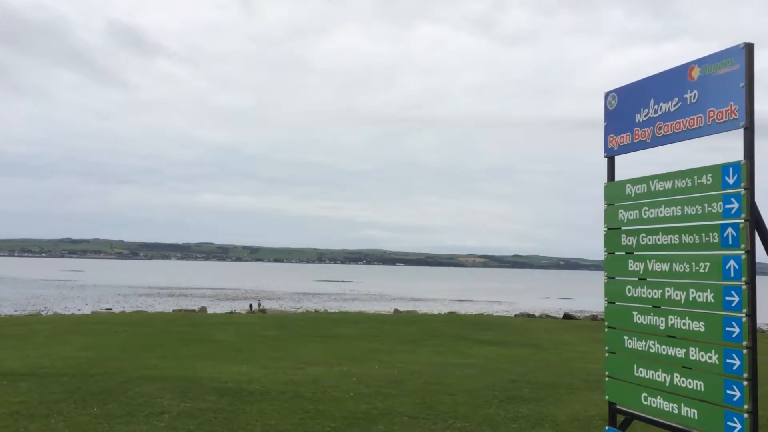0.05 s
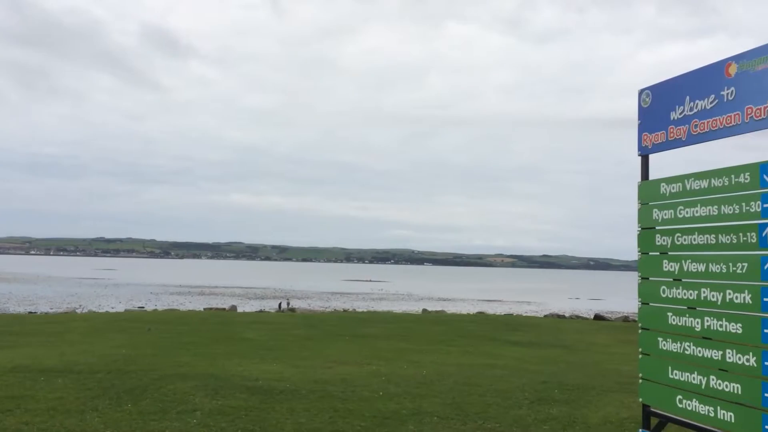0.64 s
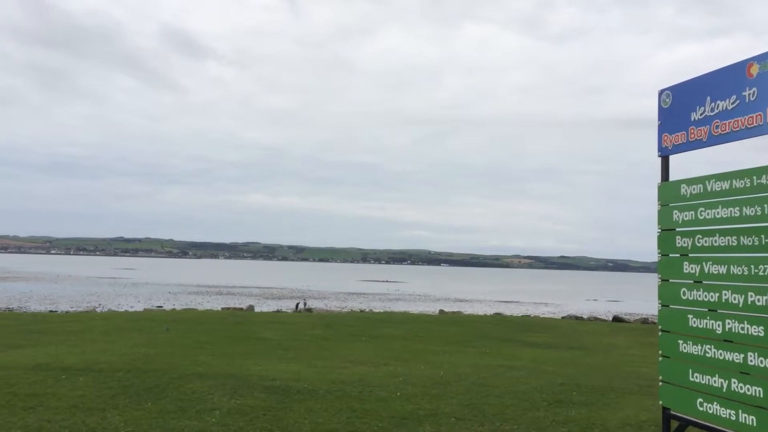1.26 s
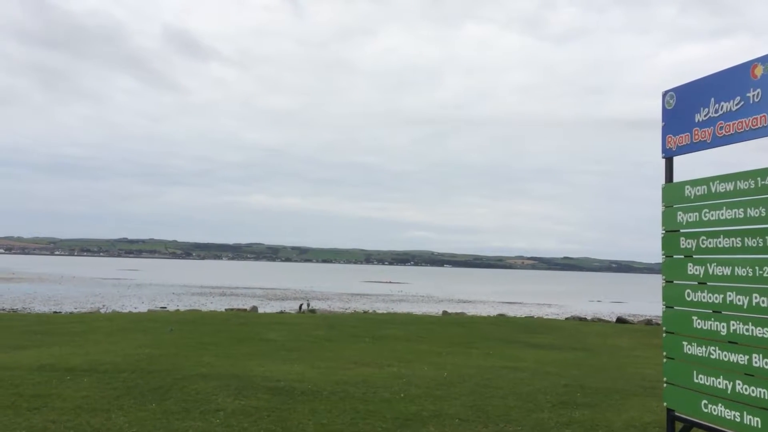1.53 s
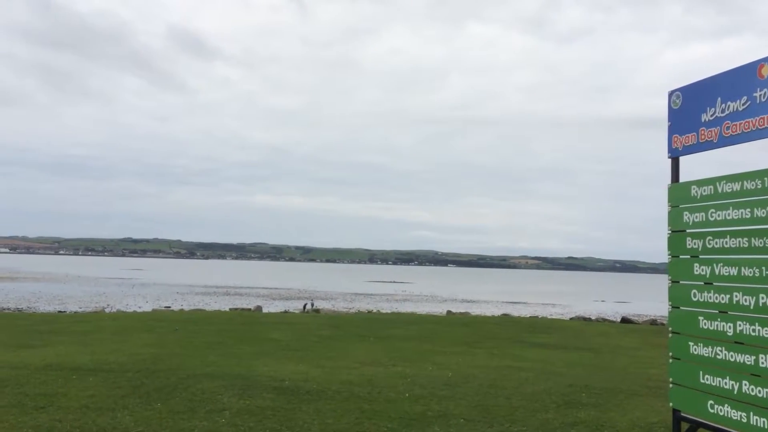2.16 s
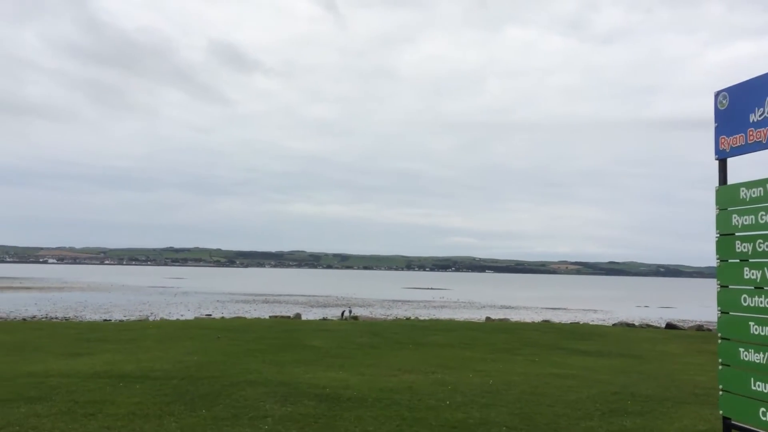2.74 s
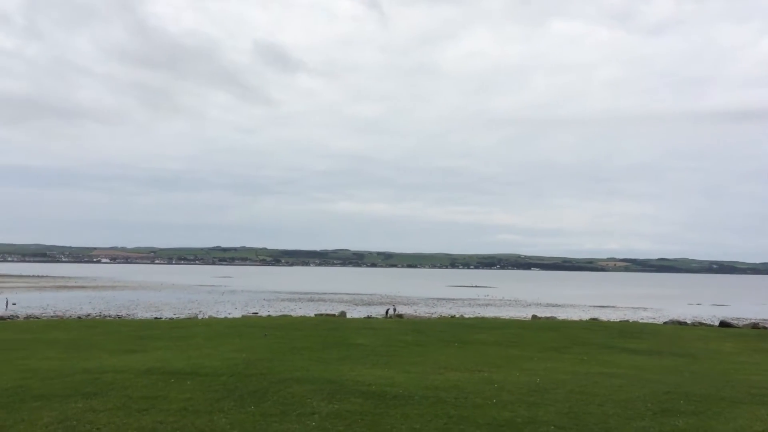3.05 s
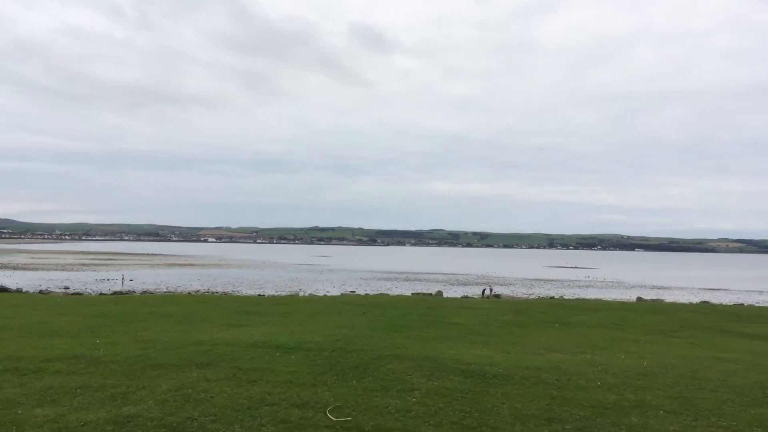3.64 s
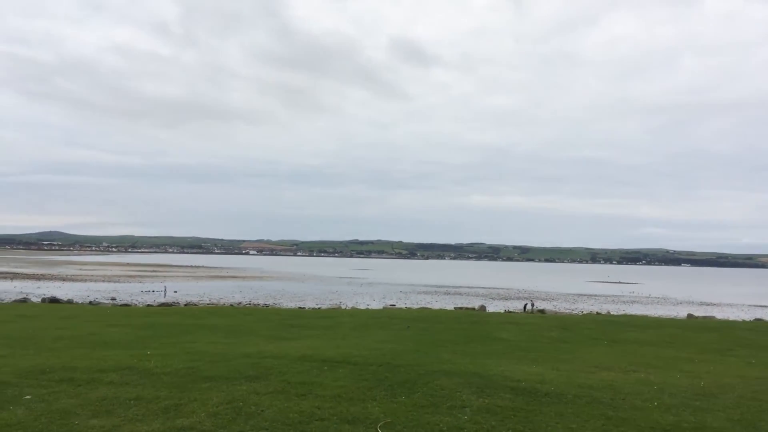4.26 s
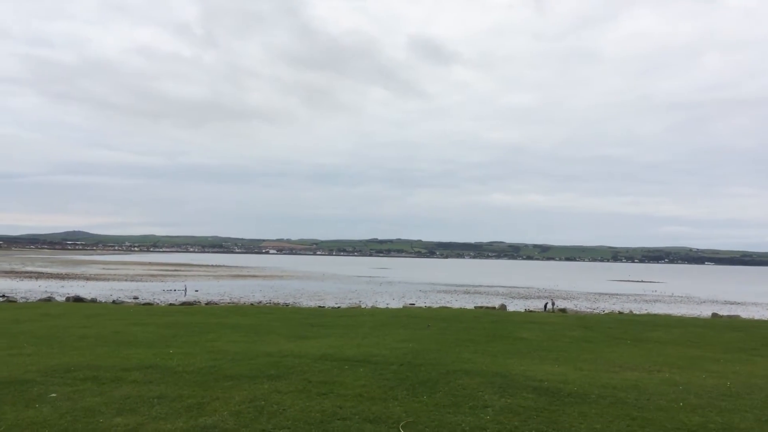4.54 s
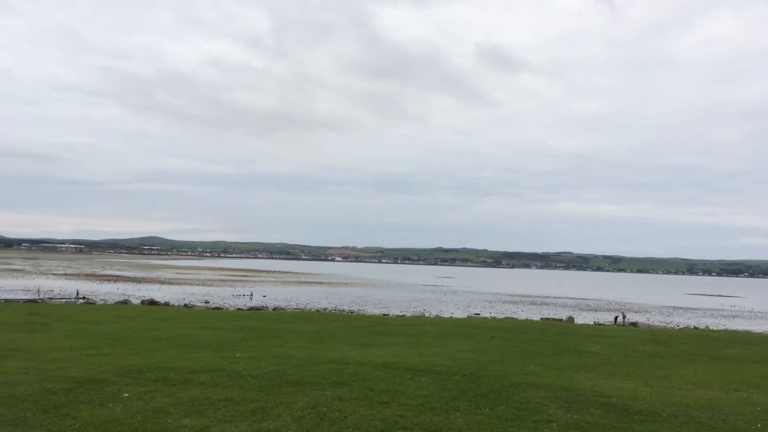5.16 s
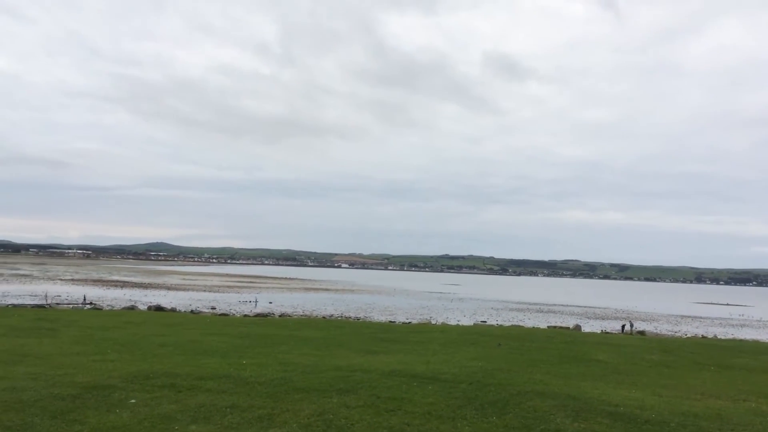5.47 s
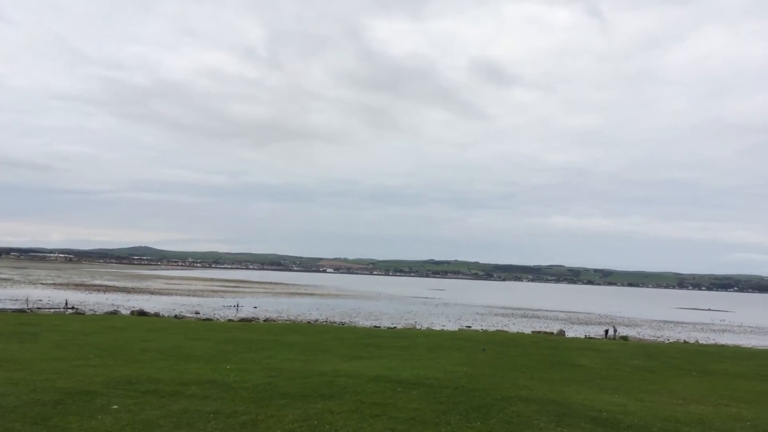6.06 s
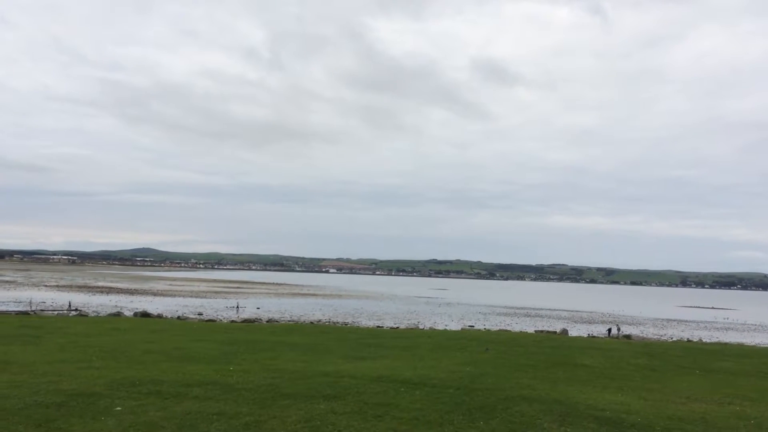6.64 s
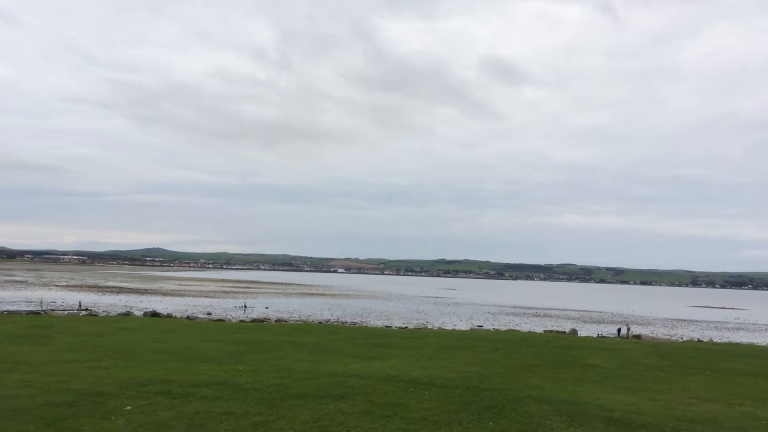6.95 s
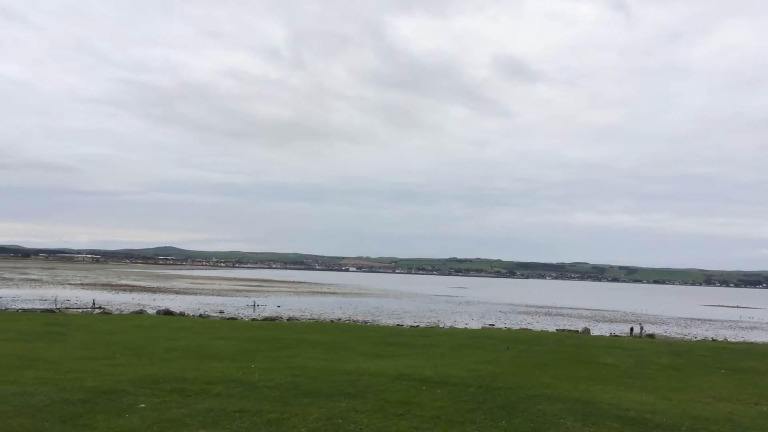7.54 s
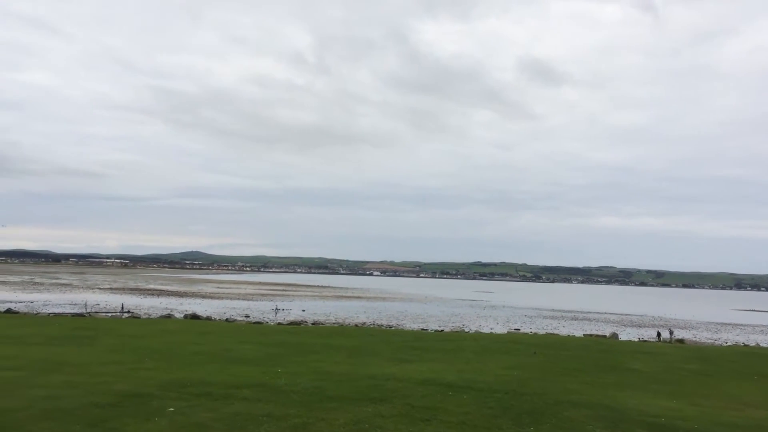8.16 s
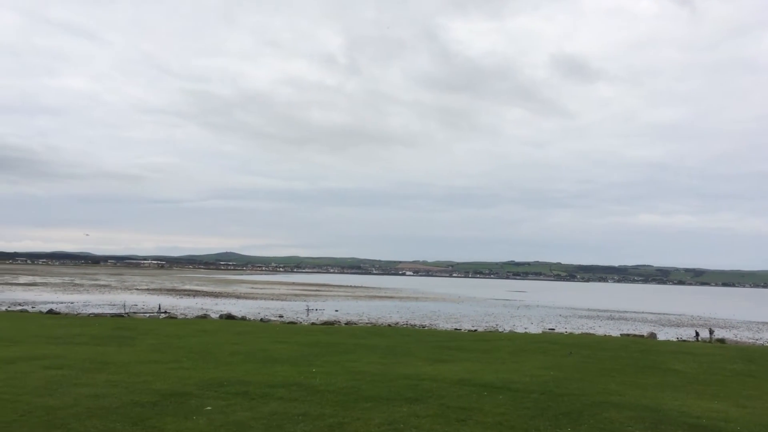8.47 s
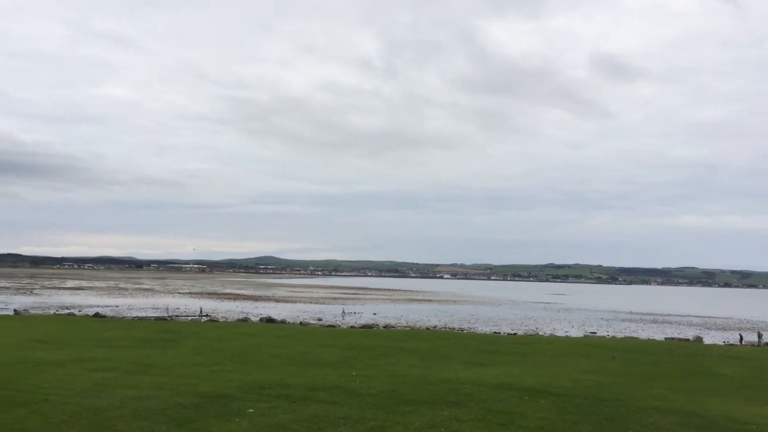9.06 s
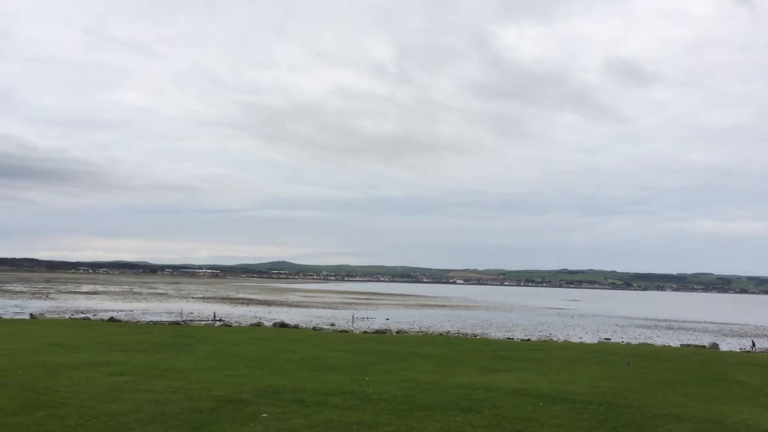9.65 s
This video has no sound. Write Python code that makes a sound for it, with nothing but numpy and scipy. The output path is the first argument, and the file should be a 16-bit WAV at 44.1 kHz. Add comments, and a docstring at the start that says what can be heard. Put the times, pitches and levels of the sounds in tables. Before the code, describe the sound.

On an open grassy shore, a sparrow close to the microphone gives short, high chirps in pairs. Shore birds pipe further out, and gulls faintly wail and yelp early on. A distant road roars softly over the bay's steady low rumble, growing louder with a drone from halfway as small waves wash in. Wind puffs buffet the microphone, hardest near the end, just before a quick run of chirrups.

```python
"""A grassy shore on a breezy day, one microphone. From the start a sparrow close by whistles paired
chirps with its syrinx, shore birds pipe and gulls wail out on the flats, and tyres roar softly on a
distant road over the rumble of the bay. Around 2 s the gulls yelp and a far engine hums by. From halfway
the road grows louder and gains a drone, hollow wavelets wash in and a soft hiss swells twice. Puffs of
wind buffet the microphone, hardest at 8.6 s, just before the sparrow's closing chirrups."""
import sys
import numpy as np
from scipy import signal
from scipy.fft import rfft, irfft
from scipy.io import wavfile
from scipy.ndimage import uniform_filter1d, map_coordinates

SR = 44100
rng = np.random.default_rng(int(sys.argv[2]) if len(sys.argv) > 2 else 0)


def to_wav(sig):
    """Store sig (one row per channel, or 1-D mono) as 16-bit WAV at the path in sys.argv[1].

    Samples outside -1..1 are clipped; the rate is SR.
    """
    pcm = np.clip(np.atleast_2d(sig), -1, 1) * 32767
    pcm = np.round(pcm).astype(np.int16)
    wavfile.write(sys.argv[1], SR, pcm.T)  # frames by channels


N = 432621
T = np.arange(N) / SR


def sparrow():
    """The bird close to the microphone pairs a flick with a tweet, or a tumble with a chirrup."""
    out = np.zeros(N)
    for table, voice in [(FLICKS, flick), (TWEETS, tweet), (TUMBLES, tumble),
                         (CHIRRUPS, chirrup), (SECOND_VOICE, second_voice)]:
        for s, *row in table:
            add(out, s, voice(*row))
    for s, *_, db in TWEETS:
        add(out, s - UPSTROKE_S, upstroke(db))
    fizz = wash([(300, -2), (3000, -5), (10000, -16)], patchy_db=2.5)  # Hz away from the note, dB
    return out * (1 + gain_of(-17) * fizz)  # a faint hiss edges each chirp


def note(hz, db, rasp=.15, onset_db=-5.5, onset_s=.014):
    """One slightly raspy sparrow note that swells in and follows a pitch and a level."""
    t = np.arange(len(hz)) / SR
    hz = uniform_filter1d(hz, size=90)  # muscles round off the turns
    tone = whistle(hz, overtone_db=-28, flutter=.018, flutter_hz=903)
    tone *= 1 + rasp * wander(len(t), 3000)
    swell_db = onset_db * np.exp(-t / onset_s)
    return tone * gain_of(db + swell_db) * signal.windows.tukey(len(t), 250 / len(t))


def beak_db(hz, resonance_hz=5000, db_per_octave=-22.5):
    """Loss on either side of the beak's resonance."""
    return db_per_octave * abs(np.log2(hz / resonance_hz))


# Soft flicks. Each row: start in seconds, level in dB before the beak's loss.
FLICKS = [(.927, -65.5), (2.356, -69), (2.384, -59), (6.236, -64), (8.084, -71), (8.112, -64)]
# Their shared swing. Each row: seconds into the flick, pitch in Hz.
FLICK_SWING = [(0, 4450), (0.01, 7480), (0.025, 3700), (.032, 6070)]

def flick(db):
    """The pitch goes up, down and up again in a thirtieth of a second."""
    hz, = follow(FLICK_SWING, np.arange(0, FLICK_SWING[-1][0], 1 / SR))
    return note(hz, db + beak_db(hz))


# Tweets. Each row: start and length in seconds, base pitch in Hz, climb in Hz per second,
# level in dB before the beak's loss.
TWEETS = [(1.089, 0.034, 5220, 19000, -50), (2.555, 0.033, 5260, -9000, -50.5),
          (6.401, 0.029, 4930, 16000, -53), (8.274, 0.036, 5140, -8000, -50)]
UPSTROKE_S = .014

def tweet(length, base_hz, climb, db, scoop=.26, scoop_s=.0069, fade_db=-21):
    """A note that scoops up from below, then slides and fades."""
    t = np.arange(0, length, 1 / SR)
    hz = base_hz * (1 - scoop * np.exp(-t / scoop_s)) + climb * t
    return note(hz, db + beak_db(hz) + fade_db * (t / length) ** 2)


def upstroke(tweet_db):
    """A faint, very fast rise that leads into a tweet."""
    hz = np.linspace(4000, 6100, round(UPSTROKE_S * SR))
    return note(hz, tweet_db - 13 + beak_db(hz))


# Soft tumbles. Each row: start, length, time up high and fall time in seconds, warbles per second,
# warble depth as a share of pitch, level in dB before the beak's loss.
TUMBLES = [(4.672, 0.11, 0.036, .004, 45, 0.23, -60), (7.08, 0.14, 0.041, 0.0074, 35, 0.25, -64.5),
           (8.51, 0.073, .038, 0.0035, 24, .11, -62.5), (8.845, 0.073, 0.04, 0.0022, 31, 0.066, -54.5)]

def tumble(length, high_s, fall_s, rate, depth, db, high_hz=7070, low_hz=4310):
    """A note that starts thin and high, then drops to a low warble that sinks and fades."""
    sag_hz_per_s, fade_db_per_s = 5900, -64
    t = np.arange(0, length, 1 / SR) - high_s
    low_s = np.maximum(t, 0)
    hz = low_hz + (high_hz - low_hz) / (1 + np.exp(t / fall_s)) - sag_hz_per_s * low_s
    hz *= 1 + depth * warble(t * rate + .5)
    return note(hz, db + beak_db(hz) + fade_db_per_s * low_s)


# Chirrups. Each row: start and length in seconds, start, middle and end of the glide in Hz,
# warbles per second, warble depth as a share of pitch, level in dB.
CHIRRUPS = [(.003, 0.054, 4180, 4200, 3220, 55, 0.25, -64), (.122, 0.064, 4600, 5050, 4100, 30, 0.37, -54),
            (4.833, .021, 3500, 6140, 4700, 20, .02, -64), (4.849, 0.0535, 4200, 4760, 4430, 34, 0.24, -50),
            (7.225, 0.038, 4620, 3950, 6530, 22, 0.08, -66),
            (7.263, .056, 5530, 5000, 4250, 36, 0.19, -53.5),
            (8.691, 0.096, 3500, 6210, 5000, 30.6, 0.2, -52.5),
            (8.908, .04, 3740, 2900, 4240, 46, .1, -68.5),
            (9.008, 0.032, 4650, 4300, 4950, 29, 0.24, -58.5),
            (9.032, 0.065, 4600, 6450, 4500, 26, 0.11, -51.5),
            (9.088, 0.013, 4700, 5500, 4380, 20, .02, -55)]
NOTE_ENDS_DB = -7

def chirrup(length, start_hz, middle_hz, end_hz, rate, depth, db, crest_db=-12):
    """A glide with a warble riding on it, weaker on each crest and towards its ends."""
    t = np.arange(0, length, 1 / SR)
    u, crest = t / length, warble(t * rate)
    hz = glide([start_hz, middle_hz, end_hz], u) * (1 + depth * crest)
    return note(hz, db + crest_db * crest ** 2 + NOTE_ENDS_DB * (2 * u - 1) ** 4)


# The sparrow's second voice. Each row: start and length in seconds, top pitch in Hz, level in dB.
SECOND_VOICE = [(.118, 0.015, 4400, -59), (.149, .016, 4570, -60), (4.866, 0.016, 4610, -47.5),
                (8.854, 0.013, 5350, -61), (8.917, 0.016, 5900, -63), (9.054, 0.027, 4540, -61)]

def second_voice(length, top_hz, db):
    """The other side of the syrinx adds a short, cleaner arch."""
    u = np.linspace(0, 1, round(length * SR))
    hz = top_hz * arch(u, rise=.13, sag=.14)
    return note(hz, db + NOTE_ENDS_DB * (2 * u - 1) ** 2, rasp=.099)


# The nearer shore birds. Each row: start and length in seconds, top pitch in Hz, level in dB before lift.
PIPES = [(.048, 0.063, 3060, -69), (0.38, 0.053, 2670, -71.5), (0.438, 0.03, 2980, -67.5),
         (0.577, 0.087, 2680, -72.5), (0.993, .052, 2670, -71), (1.154, 0.035, 2600, -71),
         (1.226, 0.067, 2620, -70.5), (1.412, 0.03, 2600, -70.5), (1.496, 0.082, 2690, -70.5),
         (1.667, .06, 2680, -75), (2.031, 0.046, 2970, -71), (4.304, 0.034, 2550, -67.5),
         (4.352, 0.053, 2840, -69.5), (4.874, 0.056, 3270, -67.5), (5.588, 0.067, 3270, -67),
         (6.067, 0.15, 3240, -69.5), (6.258, 0.085, 3270, -74), (6.706, 0.12, 3280, -74.5),
         (7.603, 0.042, 2670, -68), (8.146, 0.11, 2475, -71), (8.414, 0.096, 2587, -71.5),
         (8.677, 0.11, 2660, -68.5), (8.921, .15, 2570, -66), (9.202, 0.077, 2630, -68.5),
         (9.235, .11, 2632, -65.5), (9.459, 0.049, 2690, -69.5), (9.533, 0.084, 2605, -68.5),
         (9.623, .042, 3120, -75)]
# The flock's bouts. Each row: start and end in seconds, calls per second, mean pitch in Hz, level in dB.
FLOCK_BOUTS = [(0, 2.4, 12, 2580, -78), (3.201, 6.8, 5.3, 2850, -78), (7.5, 9.7, 10, 2464, -75.5)]

def shore_birds(lift_db=2, pitch_spread=.0595, spread_db=5.5, call_s=(.03, .1)):
    """Pipers out on the flats, over a flock that chatters further from the microphone."""
    out = np.zeros(N)
    for s, length, hz, db in PIPES:
        add(out, s, pipe(length, hz, db + lift_db))
    for start, end, rate, hz, db in FLOCK_BOUTS:
        draws = rng.uniform(-1, 1, (64, 4))
        for s, (late, longer, higher, louder) in zip(np.arange(start, end, 1 / rate), draws):
            length = np.interp(longer, [-1, 1], call_s)
            call = pipe(length, hz * (1 + pitch_spread * higher), db + spread_db * louder)
            add(out, s + (1 + late) / (2 * rate), call)
    return out


# Lower pipes have the stronger octave. Each row: top pitch in Hz, relative octave level in dB.
PIPE_OCTAVE = [(2650, -16), (3100, -27)]

def pipe(length, top_hz, db):
    """One arched piping note; the long path through moving air makes it flicker."""
    u = np.linspace(0, 1, round(length * SR))
    hz = top_hz * arch(u, rise=.096, sag=.115)
    tone = whistle(hz, spectrum_db(PIPE_OCTAVE, top_hz), flutter=.005, flutter_hz=300)
    husky = unit_rms(tone * (1 + .25 * wander(len(u), 601)))
    envelope = signal.windows.tukey(len(u), .22) * (1 - .3 * u)
    return husky * gain_of(db + 2.6 * wander(len(u), 130)) * envelope


# Gulls far out. Each row: start and length in seconds, top pitch in Hz, level in dB.
GULL_WAILS = [(0.176, 0.21, 1278, -68), (0.643, 0.2, 1258, -66.5)]

def gull_wails(hoarse=.01, overtones_db=(0, -3, -21, -22)):
    """Hoarse wails: the fundamental does not carry to the microphone, only harmonics 2 to 5."""
    out = np.zeros(N)
    for s, length, top_hz, db in GULL_WAILS:
        u = np.linspace(0, 1, round(length * SR))
        phase = phase_of(top_hz * arch(u, rise=.11, sag=.17) * (1 + hoarse * wander(len(u), 900)))
        cry = sum(gain_of(level) * np.sin(k * phase) for k, level in enumerate(overtones_db, 2))
        cry *= 1 + .7 * wander(len(u), 1200)  # rasp
        add(out, s, gain_of(db) * unit_rms(cry) * signal.windows.tukey(len(u), .5))
    return out


# Distant yelps. Each row: start and length in seconds, start pitch in Hz, level in dB.
GULL_YELPS = [(1.749, .065, 1202, -67.5), (2.152, 0.039, 1153, -69)]

def gull_yelps(fall=.16, overtones_db=(3, -5, -8, -12)):
    """Short raspy yelps whose harmonics 2 to 5 slide down together."""
    out = np.zeros(N)
    for s, length, hz, db in GULL_YELPS:
        u = np.linspace(0, 1, round(length * SR))
        phase = phase_of(hz * (1 - fall * u))
        cry = sum(gain_of(level) * np.sin(k * phase) for k, level in enumerate(overtones_db, 2))
        cry *= 1 + .7 * wander(len(u), 900)  # rasp
        add(out, s, gain_of(db) * unit_rms(cry) * signal.windows.tukey(len(u), .4))
    return out


# Other far birds. Each row: start and length in seconds, start, middle and end pitch in Hz, level in dB.
SLURS = [(1.77, 0.062, 2750, 2380, 2100, -69), (2.288, 0.048, 5190, 4130, 3150, -72.5),
         (2.643, 0.027, 4800, 5030, 4500, -77), (2.825, .043, 3070, 3420, 3580, -78),
         (3.585, .04, 4750, 5150, 4800, -80), (3.932, .04, 4800, 5080, 4700, -80),
         (4.797, 0.025, 1170, 1150, 1120, -52.5), (5.242, 0.041, 2760, 2300, 1850, -62),
         (5.498, 0.039, 4880, 4830, 4400, -77), (5.666, 0.043, 2590, 2350, 1800, -64),
         (5.992, 0.042, 4700, 4820, 4640, -76)]

def small_birds(husky_span_hz=4200):
    """Thin notes that slur through three pitches; the wider the slide, the huskier."""
    out = np.zeros(N)
    for s, length, *pitches, db in SLURS:
        rasp = min(np.ptp(pitches) / husky_span_hz, 1)
        u = np.linspace(0, 1, round(length * SR))
        tone = whistle(glide(pitches, u), overtone_db=-24, flutter=.008, flutter_hz=500)
        husky = unit_rms(tone * (1 - rasp + rasp * wander(len(u), 1000)))
        add(out, s, husky * gain_of(db + 2 * wander(len(u), 105)) * signal.windows.tukey(len(u), .4))
    return out


# Wind right on the microphone. Each row: middle in seconds, level in dB, eddy rate in Hz.
PUFFS = [(1.744, -47, 83.5), (1.853, -47, 88), (1.9, -47.5, 76.5), (2.062, -45, 74.5), (2.618, -43.5, 190),
         (2.675, -40, 148), (2.732, -42.5, 86.6), (3.328, -37.5, 97), (3.355, -39, 85.5), (3.827, -40, 135),
         (4.383, -32, 114), (4.655, -41, 86.5), (4.757, -41.5, 129), (5.208, -36, 77),
         (6.423, -35.5, 113.6), (6.478, -35, 88), (7.392, -42.5, 83), (7.43, -43, 85), (7.827, -40.5, 79),
         (7.953, -38, 128), (7.996, -36.5, 70), (8.074, -33.5, 90), (8.092, -37, 139), (8.242, -35, 135),
         (8.258, -31, 115), (8.288, -34.5, 109), (8.635, -23, 106), (9.38, -42.5, 112), (9.45, -41.5, 78.5)]

def wind_puffs(length_s=.022, core_weight=12, crisp=.69, top_hz=640):
    """Single eddies thump the microphone: the faster the eddy, the higher it reaches."""
    out = np.zeros(N)
    t, hz = (np.arange(8192) - 4096) / SR, np.fft.rfftfreq(8192, 1 / SR)
    for s, db, eddy_hz in PUFFS:
        ratio = hz / (1.163 * eddy_hz)  # frequency over the eddy's upper corner
        low_cut = ratio ** 2 / (ratio ** 2 + .12)
        colour = low_cut / (1 + ratio ** 4.27) / (1 + (hz / top_hz) ** 8)
        swirl = rng.standard_normal(len(t)) * np.exp(-abs(t) / (length_s / 2))
        force = np.sqrt(gain_of(db + 30))
        # pressure flips as the core passes, sharply in hard puffs
        core = 1j * core_weight * (1 + crisp * force * ratio) * rfft(t == 0)
        puff = irfft((rfft(swirl) + core) * colour)
        add(out, s + t[0], gain_of(db) * puff * np.sqrt(length_s * SR / np.sum(puff ** 2)))
    return out


# Hard puffs. Each row: middle in seconds, level in dB, pitch in Hz.
SLAPS = [(4.382, -37.5, 236), (6.421, -32, 300), (8.258, -28, 255), (8.6323, -15, 282)]

def wind_slaps(width_cycles=.45):
    """Each hard puff slaps the microphone with one abrupt flip of pressure."""
    out = np.zeros(N)
    for s, db, hz in SLAPS:
        cycles = hz * (T - s)
        out -= gain_of(db) * np.sin(2 * np.pi * cycles) * np.exp(-(cycles / width_cycles) ** 2)
    return out


# The breeze between the puffs. Each row: time in seconds, level in dB.
BREEZE = [(.3, -79), (.7, -60), (1.5, -71.5), (1.8, -55), (2.1, -78), (2.33, -57), (3, -71), (3.87, -50.5),
          (4.15, -54.5), (4.8, -53), (5.1, -63.5), (6.45, -54.5), (6.75, -63), (7.7, -56), (8.15, -43),
          (8.45, -57), (8.6, -33.5), (8.73, -47), (9.8, -54.5)]
# Its eddies. Each row: frequency in Hz, relative density in dB.
BREEZE_COLOUR = [(15, -27), (35, -4), (60, 6), (100, -1.5), (150, -6.5), (220, -16.5), (350, -24),
                 (600, -33), (1500, -70)]

def breeze(lumpy_db=3.5):
    """Eddies rumble unevenly across the microphone."""
    eddies = wash(BREEZE_COLOUR, patchy_db=3) * gain_of(lumpy_db * wander(N, 22))
    return fader(BREEZE) * unit_rms(eddies)


# The distant road. Each row: time in seconds, roar in dB, openness from 0 (dull) to 1 (in the clear).
ROAD = [(0, -64.5, 0.8), (1.1, -65, 0.7), (2.3, -59, 0.15), (3.5, -58.5, 0.04), (4.1, -59.5, 0.67),
        (4.8, -53.5, 0.9), (6.2, -55.5, 0.87), (6.55, -53, 0.8), (7.33, -54.5, 0.78), (7.55, -58, 0.25),
        (8.3, -60, 0.03), (8.8, -64.5, 0.3), (9.25, -64, 0.15), (9.55, -61, 0.22), (9.8, -58.5, 0.23)]
# Tyres, dull and in the clear. Each row: frequency in Hz, relative density in dB.
TYRES_DULL = [(450, -34), (570, -22), (640, -5.5), (820, -4), (960, 1), (1130, 0.5), (1400, -8.5),
              (1800, -16), (2300, -18), (3200, -46), (9000, -67)]
TYRES_OPEN = [(100, -36), (450, -12.5), (750, -9.5), (980, -7), (1250, 3), (1500, 1.5), (1950, -5),
              (2130, -15), (2600, -15), (3200, -17.5), (4200, -26.5), (5500, -39), (9000, -77)]
# An engine's drone. Each row: time in seconds, level in dB.
DRONE = [(0, -80), (4.2, -80.5), (4.8, -60.5), (7.3, -60.5), (9.8, -73)]
# Its orders. Each row: frequency in Hz, relative level in dB.
DRONE_ORDERS = [(74, -0.4), (145, -0.6)]

def road(waver=.03614):
    """Tyre roar that brightens as cars come into the clear, with a wavering engine drone."""
    roar_db, openness = follow(ROAD, T)
    dull = np.sqrt(1 - openness) * wash(TYRES_DULL, patchy_db=2)
    bright = np.sqrt(openness) * wash(TYRES_OPEN, patchy_db=2)
    phase_per_hz = phase_of(1 + waver * wander(N, 15))
    engine = sum(gain_of(db + 1.3 * wander(N, 21)) * np.sin(hz * phase_per_hz) for hz, db in DRONE_ORDERS)
    return gain_of(roar_db) * (dull + bright) + fader(DRONE) * unit_rms(engine)


# An engine passing far off. Each row: time in seconds, level in dB.
MOTOR = [(.3, -87), (1.5, -66.5), (2.4, -63), (3.1, -63.5), (3.7, -72), (4.2, -85)]
# Its colour at the microphone. Each row: frequency in Hz, relative level in dB.
MOTOR_COLOUR = [(625, -8.5), (780, -5), (860, 3), (940, 8), (1020, -4.5), (1170, -6), (1250, -3.5),
                (1400, -14.5)]

def motor(firing_hz=78.16, waver=.0079, flicker_db=3):
    """Only the middle orders of the firing rate carry this far, each blurred by the moving air."""
    hum = np.zeros(N)
    for hz in firing_hz * np.arange(8, 19):
        phase = phase_of(hz * (1 + waver * wander(N, 50)))
        hum += gain_of(spectrum_db(MOTOR_COLOUR, hz) + flicker_db * wander(N, 18)) * np.sin(phase)
    return fader(MOTOR) * unit_rms(hum)


# Swells, likely small waves on the shore. Each row: middle and half length in seconds, level in dB.
WAVELETS = [(5.557, 0.21, -62.5), (7.718, 0.11, -62), (9.606, 0.25, -64)]
# Their hollow colour. Each row: frequency in Hz, relative density in dB.
WAVELET_COLOUR = [(300, -31), (520, -12), (630, -4), (800, -3), (950, -13), (1400, -28), (6000, -62)]

def wavelets():
    """Each small wave is a hollow rush that swells and sinks."""
    swell = sum(gain_of(db) * np.exp(-((T - s) / half) ** 2) for s, half, db in WAVELETS)
    return swell * wash(WAVELET_COLOUR, patchy_db=3.5)


# A hiss in the background. Each row: time in seconds, level in dB.
HISS = [(5.3, -100), (5.6, -83), (6.25, -65), (6.55, -92), (7.2, -65), (7.7, -100)]
# Its colour. Each row: frequency in Hz, relative density in dB.
HISS_COLOUR = [(1900, -31), (3100, 1), (4200, -12.5), (9000, -37)]

def hiss():
    """A soft, patchy hiss that swells twice."""
    return fader(HISS) * wash(HISS_COLOUR, patchy_db=7)


# The bay as heard from the shore. Each row: frequency in Hz, relative density in dB.
BAY_COLOUR = [(20, -9), (45, -2), (75, -1), (150, -2.5), (200, -3.5), (270, -14), (450, -12), (800, -10.5),
              (1500, -20), (2500, -24), (3500, -28), (6000, -32), (9000, -35.5), (15000, -38)]

def bay(level_db=-63):
    """A steady low rumble behind everything."""
    return gain_of(level_db) * wash(BAY_COLOUR, patchy_db=2.5)


def outdoors(x, wet_db, t60_s, echoes_per_s=2000):
    """Adds a thin scatter of echoes from ground, stones and fences."""
    t = np.arange(SR // 2) / SR
    taps = rng.standard_normal(len(t)) * (rng.random(len(t)) < echoes_per_s / SR)
    taps *= gain_of(-60 * t / t60_s)
    return x + gain_of(wet_db) * signal.fftconvolve(x, taps / np.linalg.norm(taps))[:N]


def wash(colour, patchy_db, smooth_hz=3500):
    """Coloured noise of rms 1; moving air lifts and drops patches of it, mostly below smooth_hz."""
    frames, hz = N // 512 + 5, np.fft.rfftfreq(2048, 1 / SR)
    real, imag, patches = rng.standard_normal((3, frames, len(hz)))
    patches = uniform_filter1d(patches, size=9, axis=0)
    patches = unit_rms(uniform_filter1d(patches, size=16, axis=1))
    db = spectrum_db(colour, hz) + patchy_db * patches / (1 + (hz / smooth_hz) ** 2)
    spectra = (real + 1j * imag) * gain_of(db)
    return unit_rms(signal.istft(spectra.T, nperseg=2048, noverlap=1536)[1][:N])


def whistle(hz, overtone_db, flutter, flutter_hz):
    """A syrinx tone of rms about 1: a trembling sine with a weak octave."""
    phase = phase_of(hz * (1 + flutter * wander(len(hz), flutter_hz)))
    return np.sqrt(2) * (np.sin(phase) + gain_of(overtone_db) * np.sin(2 * phase))


def arch(u, rise, sag):
    """Pitch factor of a call as u goes from 0 to 1: a quick lift, then a longer fall."""
    return 1 - np.where(u < .35, rise * (1 - u / .35) ** 2, sag * (abs(u - .35) / .65) ** 1.5)


def glide(pitches, u):
    """A smooth bend through a start, middle and end pitch as u goes from 0 to 1."""
    return np.polyval(np.polyfit([0, .5, 1], pitches, 2), u)


def warble(cycles):
    """Sharp crests (1) at whole cycles, round troughs (0) between."""
    return 1 - abs(np.sin(np.pi * cycles))


def wander(size, rate_hz):
    """A smooth random drift of rms about 1 that changes at the given rate."""
    place = np.arange(size) * rate_hz / SR
    return map_coordinates(rng.standard_normal(2048), [place], order=2, mode="wrap")


def phase_of(hz):
    """Running phase in radians of a changing pitch."""
    return 2 * np.pi * np.cumsum(hz) / SR


def gain_of(db):
    """Decibels to gain."""
    return 10 ** (np.asarray(db) / 20)


def unit_rms(x):
    """Scaled to rms 1."""
    return x / np.sqrt(np.mean(x ** 2) + 1e-20)


def spectrum_db(points, hz):
    """A spectrum's level at hz, joined by straight lines over log frequency."""
    f, db = np.transpose(points)
    return np.interp(np.log(hz + 1), np.log(f + 1), db)


def follow(rows, t):
    """The columns of a curve table at the times t."""
    s, *columns = np.transpose(rows)
    return [np.interp(t, s, c) for c in columns]


def fader(rows):
    """Gain over the whole scene from rows of seconds and dB."""
    return gain_of(follow(rows, T)[0])


def add(mix, s, sound):
    """Mixes a sound in at s seconds."""
    part = mix[max(round(s * SR), 0):][:len(sound)]
    part += sound[:len(part)]


def scene():
    """Birds near and far over road, bay and wind, in mono."""
    near = outdoors(sparrow(), wet_db=-20.5, t60_s=.11)
    far = outdoors(shore_birds() + gull_wails() + gull_yelps() + small_birds(), wet_db=-8.5, t60_s=.17)
    background = hiss() + road() + motor() + wavelets()
    wind = breeze() + wind_puffs() + wind_slaps()
    return (near + far + background + wind + bay())[None]


def record(dry, low_cut_hz=38, band_limit_hz=15350):
    """The microphone sheds the deepest bass; then the recorder's band limit."""
    thinned = signal.sosfiltfilt(signal.butter(3, low_cut_hz, "high", fs=SR, output="sos"), dry)
    lowpass = signal.firwin(511, band_limit_hz, window=("kaiser", 9), fs=SR)
    return signal.oaconvolve(thinned, lowpass[None], "same")


dry = scene()
out = record(dry)
to_wav(out)
```